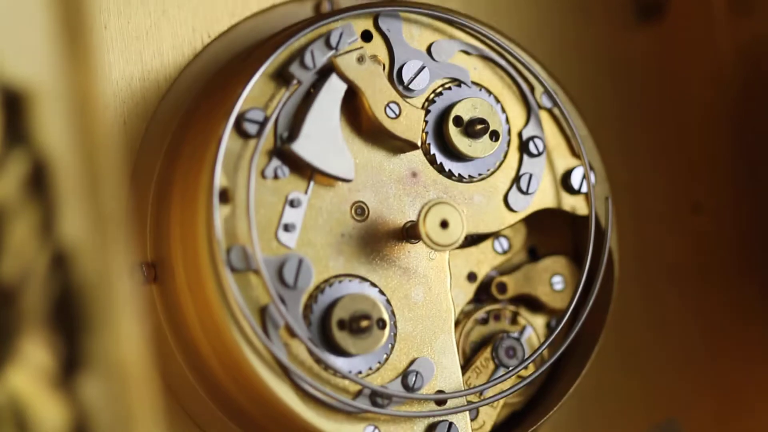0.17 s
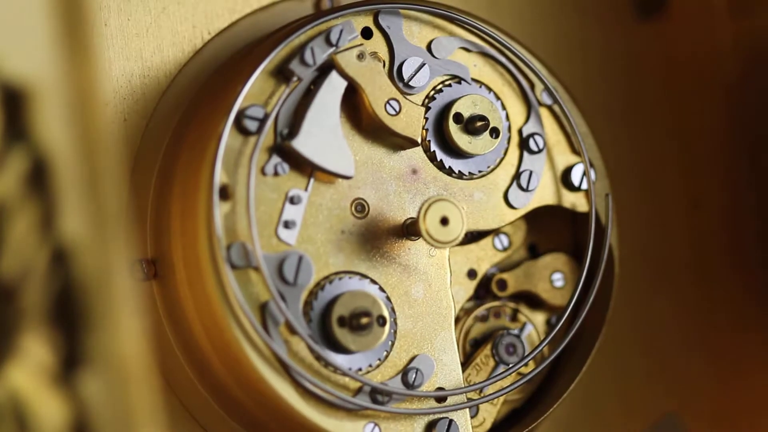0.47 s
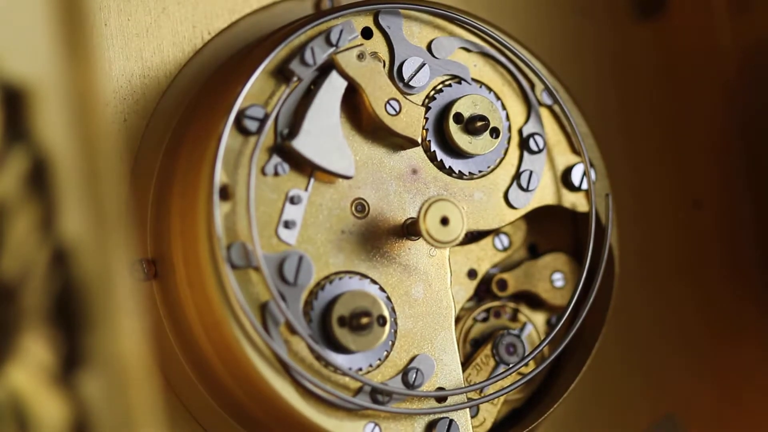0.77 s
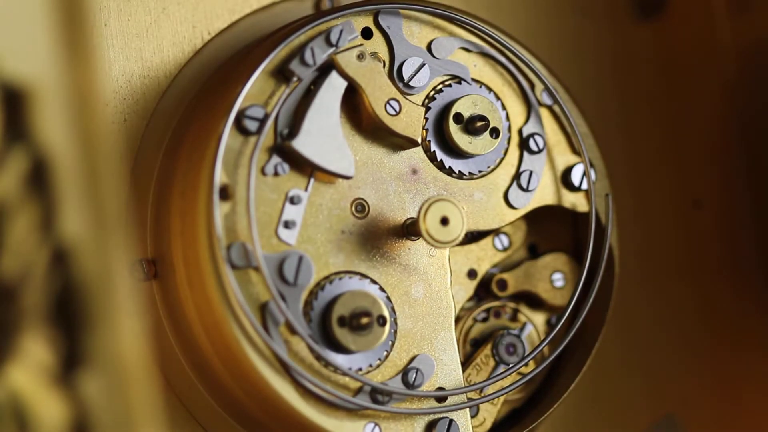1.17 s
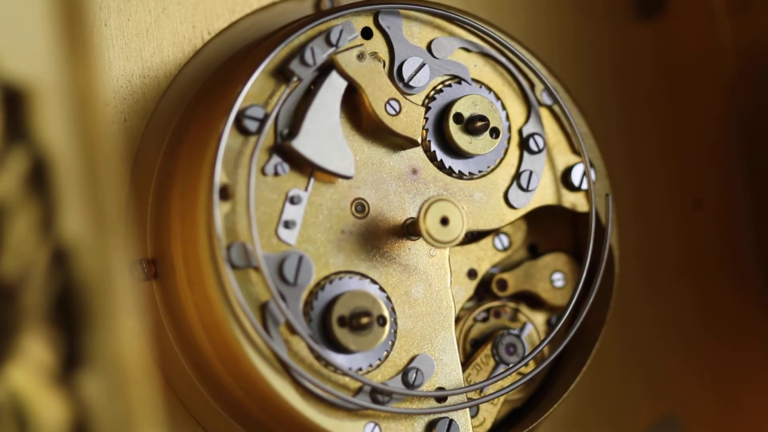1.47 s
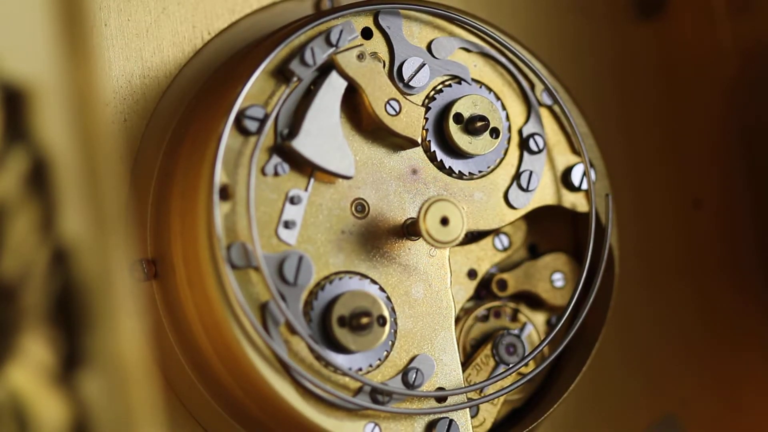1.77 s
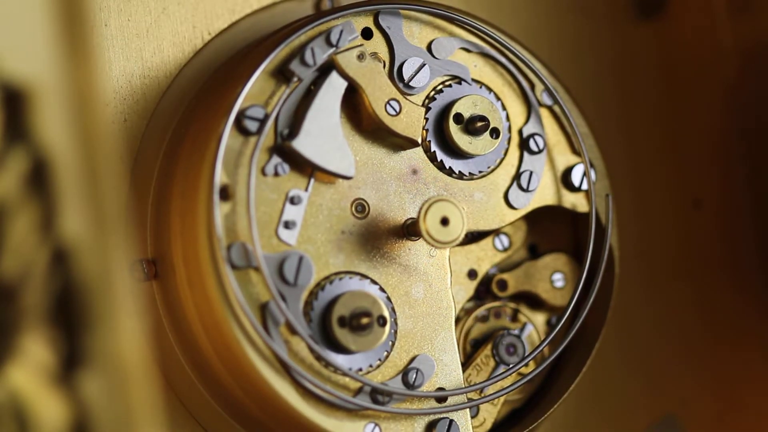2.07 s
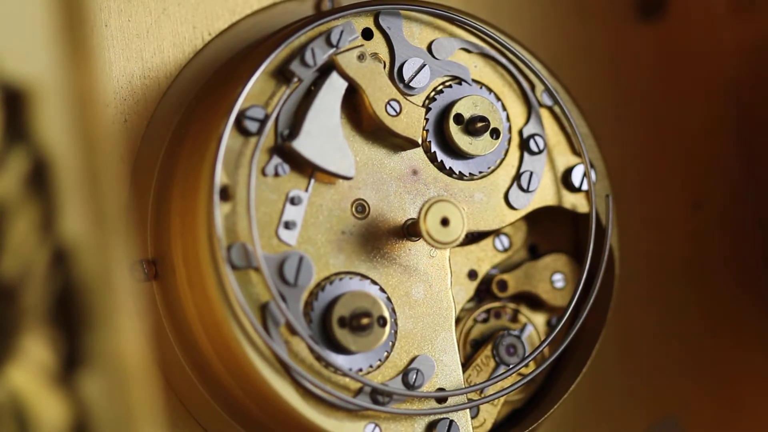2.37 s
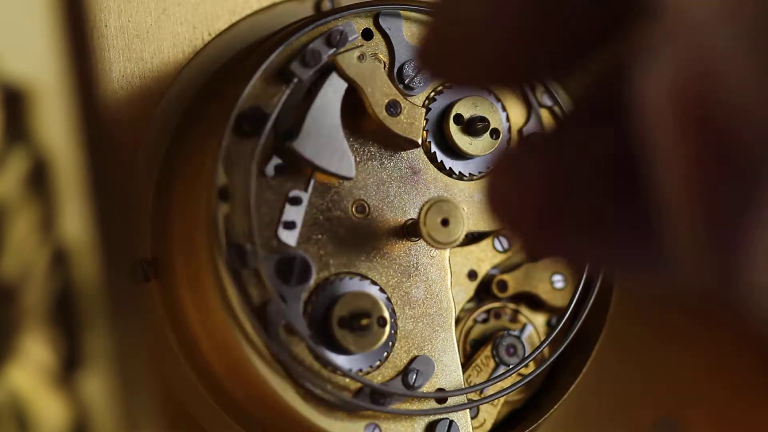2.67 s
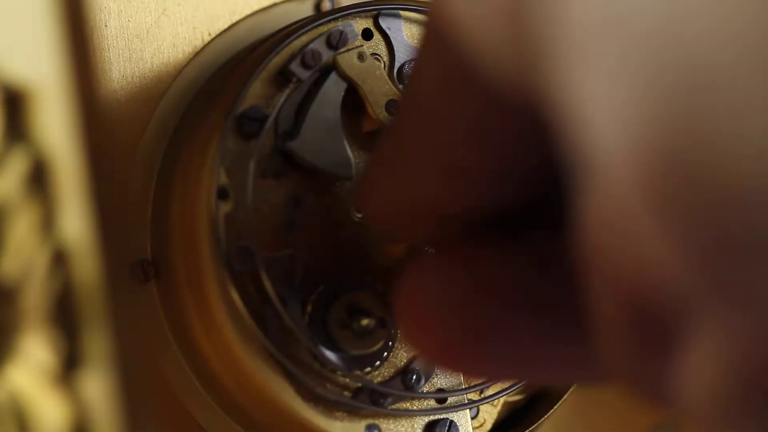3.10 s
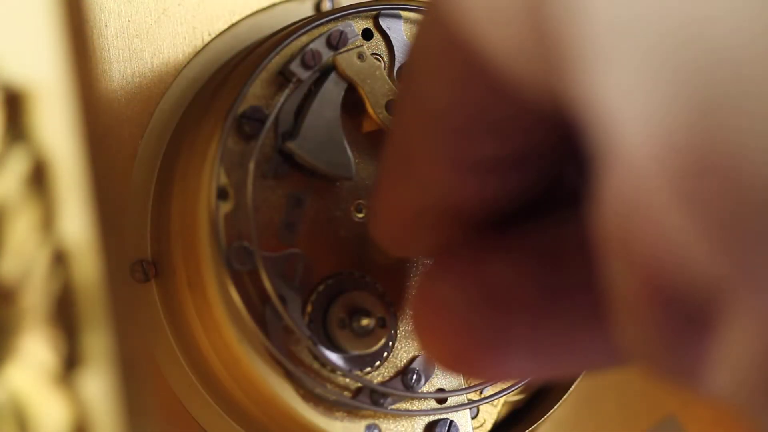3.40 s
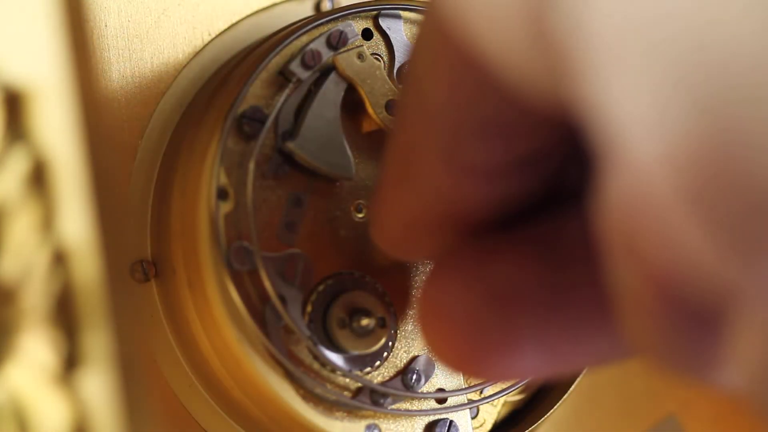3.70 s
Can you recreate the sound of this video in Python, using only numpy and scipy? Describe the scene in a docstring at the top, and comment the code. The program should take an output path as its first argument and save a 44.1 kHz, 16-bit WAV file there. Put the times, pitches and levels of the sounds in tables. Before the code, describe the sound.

A small mechanical clock ticks close up throughout, five light, high, metallic beats a second. At about 2.1 seconds a sleeve swishes once, followed by a few faint finger rubs. At about 3.7 seconds a winding key clicks sharply against the brass movement, louder than the ticks, briefly ringing the case. Behind it, the quiet room hums and a faint, thin hiss slowly grows.

```python
"""Small clock, close up

A lever escapement ticks five times a second, close to the microphone in a quiet, humming room;
each beat is a cluster of tiny contacts ringing steel parts. A sleeve swishes as a hand reaches in,
and near the end a winding key clicks against the brass movement and rings the case.
A narrow high hiss slowly swells behind it all."""
import sys
import numpy as np
from scipy import signal
from scipy.fft import rfft, irfft
from scipy.io import wavfile
from scipy.ndimage import uniform_filter1d

SR = 44100
rng = np.random.default_rng(int(sys.argv[2]) if len(sys.argv) > 2 else 0)


def put_to_file(sound):
    """Save the sound as 16-bit audio at rate SR, in the file named by the first command-line argument."""
    columns = np.atleast_2d(sound).T  # one column per channel
    safe = np.clip(columns, -1, 1)
    whole_steps = np.round(safe * 32767)
    wavfile.write(sys.argv[1], SR, whole_steps.astype(np.int16))


N = 169785
T = np.arange(N) / SR


def amp(db):
    """Decibels to gain."""
    return 10 ** (np.asarray(db) / 20)


def unit(x):
    """Scale to rms 1."""
    return x / np.sqrt(np.mean(x ** 2))


def fader(curve, lag=0):
    """Gain along (time [s], level [dB]) points, delayed by lag seconds."""
    times, db = np.array(curve).T
    return amp(np.interp(T - lag, times, db))


def shaped_noise(spectrum):
    """Noise of rms 1 shaped by (frequency [Hz], level [dB]) points, falling away beyond both ends."""
    hz, db = np.array(spectrum).T
    f = np.maximum(np.fft.rfftfreq(N, 1 / SR), 1)
    gain = amp(np.interp(np.log(f), np.log(hz), db))
    skirts = np.minimum(f / hz[0], 1) ** 2 * np.minimum(hz[-1] / f, 1) ** 10
    return unit(irfft(rfft(rng.standard_normal(N)) * gain * skirts, N))


def wander(rate_hz):
    """Smooth random drift of rms 1."""
    hold = max(int(SR / rate_hz), 1)
    steps = np.repeat(rng.standard_normal(N // hold + 1), hold)
    return unit(uniform_filter1d(steps, hold)[:N])


def resonate(x, modes):
    """Pass x through parallel resonances (frequency [Hz], width [Hz], gain [dB])."""
    return sum(amp(db) * signal.lfilter(*signal.iirpeak(hz, hz / min(width, SR / np.pi), SR), x)
               for hz, width, db in modes)


def die_away(start, decay):
    """Envelope that jumps up at start and falls exponentially."""
    return (T >= start) * np.exp(-np.maximum(T - start, 0) / decay)


def chatter():
    """Rapid tiny impacts of even size and random direction."""
    return np.sign(rng.standard_normal(N))


# Steady hum in the room (frequency [Hz], level [dB])
HUM_LINES = [(120, -58.5), (206.8, -49.5), (239.7, -58.5), (471, -71.5), (879.7, -62)]
# Spectrum of the room's air (frequency [Hz], relative level [dB])
AIR_SPECTRUM = [(15, -54), (25, -46), (44, -15), (92, -13.5), (102, -9), (123, -9), (175, -8), (190, -9.5),
                (206, -1.5), (354, -15.5), (394, -11.5), (439, -20), (545, -20.5), (863, -18), (1260, -22),
                (1370, -20.5), (1520, -22.5), (1940, -22), (2610, -27.5), (4250, -30.5), (4610, -34.5),
                (5000, -28.5), (6210, -34), (8140, -35), (16000, -40.5)]
# Air noise at the microphone (time [s], level [dB])
AIR_LEVEL = [(0, -48.5), (1.2, -48.5), (2.4, -47), (3.85, -47)]
# Lift of the air's treble (time [s], gain [dB])
AIR_TREBLE = [(0, 1.5), (.6, 2.5), (.75, 0.5), (1.4, 1.5), (1.7, 2.5), (2.5, 2), (2.8, 0), (3.85, 0.5)]
def room_tone(waver_db=1.5, waver_rad=.22, split_hz=1700):
    """The quiet room around the microphone: air noise and a slightly wavering hum."""
    hum = np.zeros(N)
    for hz, db in HUM_LINES:
        peak = np.sqrt(2) * amp(db + waver_db * wander(6.05))
        hum += peak * np.sin(2 * np.pi * hz * T + waver_rad * wander(4.98))
    air = shaped_noise(AIR_SPECTRUM)
    main_hum_hz = HUM_LINES[1][0]
    air -= .69 * resonate(air, [(main_hum_hz, 25.5, 0)])  # a notch keeps the main hum line clean
    low = signal.sosfiltfilt(signal.butter(1, split_hz, fs=SR, output="sos"), air)
    treble = fader(AIR_TREBLE) * (air - low)
    return hum + fader(AIR_LEVEL) * (low + treble)


# Resonances of the high hiss (frequency [Hz], width [Hz], relative gain [dB])
HISS_MODES = [(2800, 96, -10.5), (3380, 35, -6), (4628, 26, -3.5), (4900, 80, -13), (5550, 76, -11),
              (5780, 80, -5.5), (6010, 70, 0), (6184, 72, -0.5), (6322, 54, -3), (6540, 100, -9.5),
              (6990, 33, -7.5), (7360, 66, -19)]
# Its swell at the microphone (time [s], level [dB])
HISS_SWELL = [(0, -69.5), (.9, -61.5), (1.35, -58.5), (1.5, -56), (2.3, -52.5), (2.8, -52), (3.3, -50),
              (3.85, -49)]
def hiss(flutter_db=1):
    """Behind the clock, a thin, ringing hiss flutters and slowly grows."""
    fluttering = rng.standard_normal(N) * amp(flutter_db * wander(150))
    return fader(HISS_SWELL) * unit(resonate(fluttering, HISS_MODES))


# Faint rubs (peak time [s], half length [s], centre [Hz], width [Hz], level [dB])
HAND_RUBS = [(0.19, 0.063, 7000, 14000, -55.5), (0.504, .05, 1260, 1800, -53.5),
             (0.514, 0.042, 6900, 12000, -55), (1.877, 0.088, 12900, 5000, -61),
             (2.267, 0.021, 13000, 6000, -51), (2.282, 0.0064, 1950, 1100, -44),
             (2.314, 0.0077, 1700, 900, -53.5), (2.405, 0.074, 6000, 12000, -59),
             (2.523, .006, 1190, 450, -46.5)]
def rubs():
    """Cloth and fingers make soft swells of friction as the hand moves."""
    out = np.zeros(N)
    for peak_time, half_length, hz, width, db in HAND_RUBS:
        band = [(hz, width, 0)]
        friction = unit(resonate(resonate(rng.standard_normal(N), band), band))
        swell = np.exp(-.5 * ((T - peak_time) / half_length) ** 2)
        out += amp(db) * swell * friction
    return out


# The sleeve's stroke as the hand reaches in (time [s], relative level [dB])
SLEEVE_STROKE = [(1.96, -82), (2.005, -52), (2.03, -43), (2.055, -39), (2.087, -28.5), (2.11, -31.5),
                 (2.135, -34), (2.16, -44.5), (2.19, -57), (2.23, -88)]
# Hollow body of the swish (frequency [Hz], relative level [dB])
SWISH_SPECTRUM = [(410, -54), (700, -20), (926, -29), (962, -15), (1050, -17), (1160, -4), (1310, -5.5),
                  (1500, -2), (1750, -10.5), (2310, -7.5), (2780, -13), (3430, -7), (3740, -9),
                  (4200, -4.5), (4850, -7.5), (5450, -3.5), (7000, -8), (9100, -17), (15400, -120)]
# Fizz of the weave (frequency [Hz], relative level [dB])
WEAVE_SPECTRUM = [(4000, -44), (6500, -11), (8000, 1.5), (11000, 1.5), (14000, 2), (16000, 0)]
def sleeve(swish_db=-4.5, fizz_db=-2.5, fizz_lag_s=.008):
    """Cloth slides once near the clock: a hollow swish, with the fizz of the weave just after it."""
    swish = amp(swish_db) * fader(SLEEVE_STROKE) * shaped_noise(SWISH_SPECTRUM)
    fizz = amp(fizz_db) * fader(SLEEVE_STROKE, fizz_lag_s) * shaped_noise(WEAVE_SPECTRUM)
    return swish + fizz


def reflections(x, gain_db=-4, decay_s=.023, cutoff_hz=9500):
    """Short, dense reflections of case and room reach the microphone duller than the direct sound."""
    t = T[:SR // 2]
    response = rng.standard_normal(len(t)) * np.exp(-t / decay_s)
    response /= np.sqrt(np.sum(response ** 2))
    dulled = signal.lfilter(*signal.butter(1, cutoff_hz, fs=SR), response)
    return amp(gain_db) * signal.fftconvolve(x, dulled)[:N]


# Ringing modes of the clock's case (frequency [Hz], level [dB], time to fall 60 dB [s])
CASE_RING = [(759, -35, 0.14), (885, -39, 0.09), (1350, -46, 0.16), (1465, -42.5, 0.17), (1753, -46, 0.1),
             (2880, -45, 0.089), (3830, -41, 0.027)]
# Broad resonances of its dense knock (frequency [Hz], width [Hz], relative gain [dB])
CASE_KNOCK = [(350, 220, -4), (830, 200, 4.5), (1590, 530, -0.5)]
def clock_case(hit_s=3.7265, attack_s=.0025, knock_db=-29, knock_decay_s=.027):
    """Struck by the key, the case answers with lower, longer modes and a brief knock."""
    age = np.maximum(T - hit_s, 0)
    ring = sum(amp(db - 60 * age / t60) * np.sin(2 * np.pi * (hz * age + rng.random()))
               for hz, db, t60 in CASE_RING)
    knock = amp(knock_db) * die_away(hit_s, knock_decay_s) * resonate(rng.standard_normal(N), CASE_KNOCK)
    onset = 1 - np.exp(-age / attack_s)
    return (ring + knock) * onset


# The key meets the arbor, slips and seats (time [s], force level [dB], decay [s])
KEY_HITS = [(3.722, -33, 0.0086), (3.7261, -19, .0025), (3.7276, -18.5, 0.0022), (3.7349, -31, .004)]
# Resonances of key and brass movement (frequency [Hz], width [Hz], gain [dB])
KEY_RING = [(2990, 150, 3), (3770, 210, 7.5), (4340, 230, 6.5), (5150, 280, -1), (5800, 180, 2),
            (7240, 370, 1), (8650, 490, -2), (9610, 150, 0), (10600, 520, 11), (11400, 500, 6),
            (12000, 650, 6), (12800, 380, 6), (15000, 500, -1)]
def winding_key():
    """Close to the microphone, metal scrapes and snaps onto metal, ringing key, movement and case."""
    force = sum(amp(db) * die_away(start, decay) * chatter() for start, db, decay in KEY_HITS)
    return resonate(force, KEY_RING) + clock_case() + reflections(force)


def after_pings(lag_s=.053, hz=13000, width_hz=300, level_db=-62, decay_s=.012):
    """A small steel part rings faintly a moment after every tock of the escapement."""
    envelope = sum(die_away(start + lag_s, decay_s) for start, _ in TICKS_AND_TOCKS[1::2])
    ring = unit(resonate(rng.standard_normal(N), [(hz, width_hz, 0)]))
    return amp(level_db) * envelope * ring


# Beats of the escapement, tick and tock in turn (time [s], relative level [dB])
TICKS_AND_TOCKS = [(.2465, -37.5), (0.451, -41.5), (0.6463, -39), (.8515, -41), (1.0462, -38),
                   (1.2515, -38.5), (1.4471, -37), (1.652, -36), (1.8470, -36.5), (2.0517, -43),
                   (2.2472, -44), (2.452, -39), (2.648, -37.5), (2.8524, -41.5), (3.0480, -34.5),
                   (3.2524, -38.5), (3.4488, -32.5), (3.6531, -37.5), (3.8482, -36)]
# Unlocking, impulse, drop and rebound (time from the drop [s], relative level [dB], decay [s])
LEVER_CONTACTS = [(-.0075, -9, .003), (-.004, -17, .002), (0, 0, .002), (.0017, -3, 0.0033)]
# Resonances of the steel parts (frequency [Hz], width [Hz], relative gain [dB])
STEEL_MODES = [(3250, 60, -12), (5100, 700, -8), (7700, 600, -10), (9250, 900, -13), (11440, 360, 2),
               (12050, 500, -6), (12940, 520, -3.5), (13500, 450, -5.5), (15000, 360, -8), (16000, 300, -5)]
def escapement(gain_db=5, colour_spread_db=2.5):
    """Right at the microphone, clusters of chattering contacts ring the steel and linger in the case."""
    case_tail = (.011, -22, .016)  # same columns as the contacts
    power = np.zeros(N)
    for start, beat_db in TICKS_AND_TOCKS:
        near = (T > start - .02) & (T < start + .15)
        age = T[near] - start
        for delay, contact_db, decay in LEVER_CONTACTS + [case_tail]:
            envelope = (age >= delay) * np.exp(-np.abs(age - delay) / decay)
            power[near] += (amp(beat_db + contact_db) * envelope) ** 2
    force = np.sqrt(power) * chatter()
    # each resonance drifts in level, so the colour changes from beat to beat
    return sum(amp(gain_db + colour_spread_db * wander(5.02)) * resonate(force, [mode])
               for mode in STEEL_MODES)


def scene():
    """Clock, hand and room at one close microphone, the same in both channels."""
    mono = escapement() + after_pings() + winding_key() + sleeve() + rubs() + room_tone() + hiss()
    return np.array([mono, mono])


def record(dry, open_s=.072, rumble_hz=39, top_hz=15800):
    """The recorder opens just after the start, and cuts the rumble and the top."""
    opened = dry * np.clip((T - open_s) / .003, 0, 1)
    lean = signal.sosfilt(signal.butter(4, rumble_hz, "high", fs=SR, output="sos"), opened)
    return signal.sosfilt(signal.ellip(10, .2, 70, top_hz, fs=SR, output="sos"), lean)


dry = scene()
out = record(dry)
put_to_file(out)
```